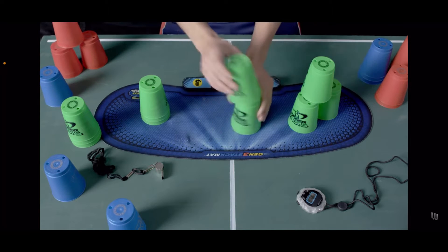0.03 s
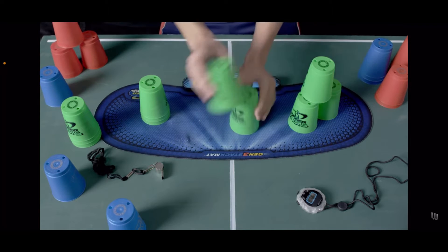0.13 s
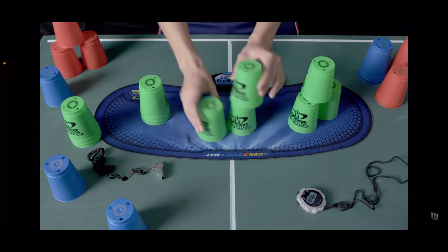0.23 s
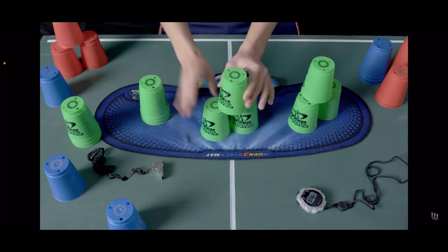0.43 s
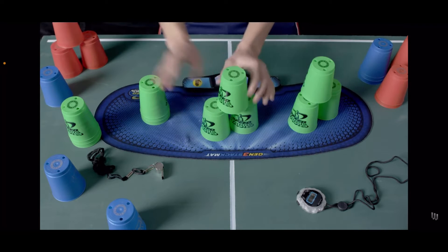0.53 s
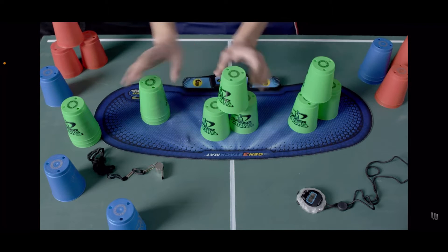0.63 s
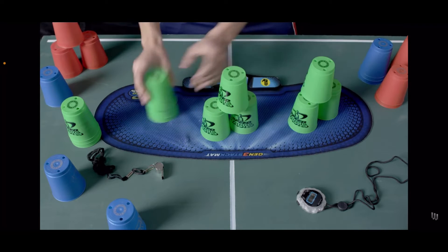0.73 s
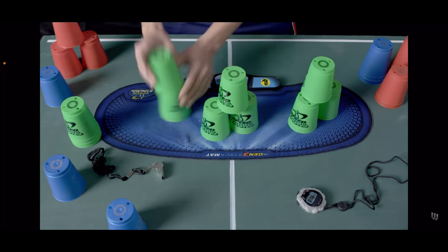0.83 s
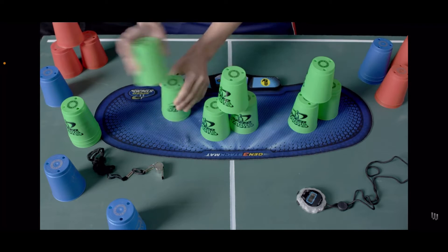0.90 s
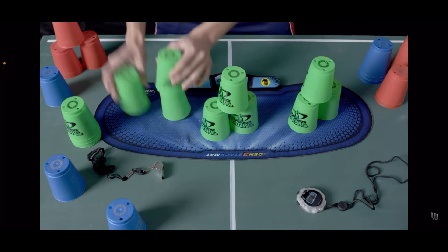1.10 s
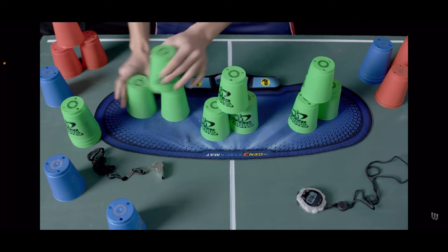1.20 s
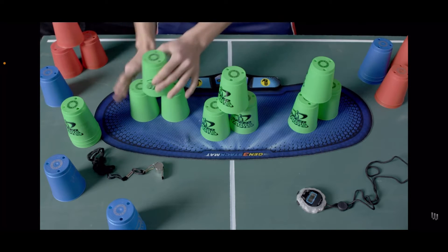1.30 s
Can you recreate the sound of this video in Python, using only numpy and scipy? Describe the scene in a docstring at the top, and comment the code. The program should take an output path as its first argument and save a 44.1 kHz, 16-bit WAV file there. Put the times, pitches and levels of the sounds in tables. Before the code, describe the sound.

In a small room, plastic cups slide apart and clack down fast on a mat-covered table. A hollow pop comes first, then a cluster of clacks, then another scrape and pop, with dull thuds beneath and a short echo.

```python
"""Stacking plastic cups

Hard plastic cups are stacked quickly on a padded mat on a table, in a small room.
Each cup scrapes out of the nested pile, then lands: its wall clacks, the air inside it pops
and the table thuds under the mat. The room rings briefly over a quiet rumble."""
import sys
import numpy as np
from scipy import signal
from scipy.fft import rfft, irfft
from scipy.io import wavfile

SR = 44100
rng = np.random.default_rng(int(sys.argv[2]) if len(sys.argv) > 2 else 0)


def generate_wav(sig):
    """Save sig (samples, or channels by samples) to the path in sys.argv[1] as 16-bit PCM at SR."""
    pcm = np.round(np.clip(np.atleast_2d(sig).T, -1, 1) * 32767).astype(np.int16)
    wavfile.write(sys.argv[1], SR, pcm)


N = 59535

# Levels in the tables are relative. A fade_s is the time a sound takes to drop by 60 dB.
# tone of the background rumble: frequency_hz, level_db
RUMBLE_TONE = [(20, -19), (40, 4.5), (100, -8), (200, -7), (500, -11.5), (1000, -27), (2500, -33.5),
               (5000, -42), (8000, -54.5)]
# the room's echo, band by band: frequency_hz, level_db, fade_s
ROOM_BANDS = [(60, -34, 0.32), (172, -7, 0.59), (280, -5, 0.19), (423, -11.5, 0.55), (866, -14.5, 0.45),
              (1350, -13, .6), (2000, -15.5, 0.57), (4000, -16, 0.35), (8000, -15, 0.18)]
# the room's share of the sound as the hands move to the farther pile: time_s, level_db
ROOM_SHARE = [(.25, -3.5), (.62, -0.5), (0.951, 0.5)]
# notes of the table under the mat: pitch_hz, level_db, fade_s
TABLE_NOTES = [(83, -13.5, 0.3), (104.8, 0, 0.089), (137.95, -7.5, 0.29), (186, -12, 0.15),
               (225, -5.5, 0.068)]
# blows through the mat: start_s, level_db, pitch_hz
MAT_BLOWS = [(0.045, -24, 124.6), (0.216, -15, 132), (0.252, -11, 161.8), (0.267, -25, 138.6),
             (0.433, -35, 125), (0.4915, -7, 225), (0.59, -12, 135), (0.616, -14, 159), (0.931, -28, 112.6),
             (1.099, -17.5, 201), (1.313, -37.5, 113)]
# a cup leaves the pile: start_s, length_s, hiss_from_db, hiss_to_db, chatter_from_db, chatter_to_db
CUP_SLIDES = [(0.115, 0.053, -44.5, -44, -55.5, -44), (0.166, 0.11, -41, -74, -46.5, -65),
              (0.499, 0.026, -46, -59, -45.5, -58), (0.903, 0.083, -63, -60, -62.5, -66),
              (0.99, 0.045, -45.5, -47.5, -71, -45.5), (1.031, .029, -42, -60, -40, -37.5),
              (1.09, 0.007, -31, -32, -29, -33.5)]
# tone of a cup sliding: frequency_hz, level_db
HISS_TONE = [(200, -17), (900, -16), (1800, -2), (4200, -12.5), (5100, -7.5), (6400, -1.5), (8000, -4.5)]
# tone of a cup coming free: frequency_hz, level_db
CHATTER_TONE = [(500, -42.5), (1200, -16), (1900, -7), (3000, -3.5), (4300, -5), (5200, -17), (8000, -19.5)]
# a cup lands mouth down and traps its air, and the mat beneath it rings: start_s, level_db, air_pitch_hz,
# mat_hz, mat_db, wall_hz, wall_db
SEALED_LANDINGS = [(.0445, -22.5, 793, 544, -5, 1100, -9.5), (0.2174, 1.5, 866, 557, -11.5, 1914, -17),
                   (1.0936, -7, 841, 456, -15, 1406, -10.5)]
# notes of the trapped air: pitch_multiple, level_db, fade_s
TRAPPED_AIR_NOTES = [(1.002, 2.5, 0.021), (1.119, -14, 0.035), (1.321, -21.5, 0.028)]
# a cup lands on others or on an edge, its mouth left open: start_s, level_db
UNSEALED_LANDINGS = [(0.4941, -16), (.579, -7.5), (0.5917, -4)]
# notes of the air in an open cup: pitch_hz, level_db, fade_s
OPEN_AIR_NOTES = [(407, 4.5, 0.041), (474.8, -14, 0.18), (551.3, -2, 0.046), (882, -23.5, 0.076),
                  (1086, -9.5, 0.02)]
# notes of a cup's wall: pitch_hz, level_db, fade_s
WALL_NOTES = [(1123, -10, 0.11), (1346, -7.5, 0.016), (1830, -22, 0.13), (2078, -4.5, 0.039),
              (2370, -6.5, 0.017), (2490, -5.5, 0.035), (2966, -7, 0.038), (3205, -2, 0.022),
              (3880, -10.5, 0.042), (4350, -12, 0.026), (5130, -19, 0.025), (5930, -12, .03),
              (6650, -4, 0.024), (7380, -1.5, 0.011)]
# tone of a rim's crack: frequency_hz, level_db
CRACK_TONE = [(200, 2), (600, 19), (1200, 0.5), (2500, 2), (4000, 1), (5500, -1.5), (7500, -7)]
# a rim strikes: start_s, level_db, low_cut_hz, high_cut_hz, crack_fade_s
RIM_HITS = [(0.0364, -34.5, 422, 9700, 0.08), (0.1741, -23.5, 2090, 5310, 0.017),
            (.1815, -18, 1380, 6230, 0.05), (.211, -26.5, 300, 2880, .03),
            (0.2164, -13.5, 1100, 9000, 0.019), (.2505, -29.5, 600, 3000, 0.041),
            (0.27, -40.5, 637, 6070, 0.077), (0.397, -49, 600, 3705, 0.024),
            (0.4923, -20.5, 780, 2800, 0.039), (.5118, -31, 1516, 8000, 0.064),
            (.5784, -15.5, 700, 2600, 0.061), (0.581, -21.5, 608, 3850, 0.11),
            (0.5939, -18, 513, 5000, 0.025), (0.5974, -17.5, 590, 4160, 0.044),
            (0.9253, -35, 1478, 7400, 0.051), (1.0519, -22.5, 1040, 3640, 0.017),
            (1.0696, -35, 1210, 1750, 0.011), (1.0926, -13, 500, 2960, 0.027),
            (1.0982, -27.5, 597, 6000, .025), (1.1032, -16, 796, 1310, 0.067)]

RUMBLE_DB, TABLE_DB, SLIDE_RING_DB, WALL_DB, CRACK_DB = -51.5, -9.5, -16, -10, -1
ROOM_GAP_S, ROOM_BUILD_S = 0.0086, 0.0055
PUSH_FADE_CYCLES = 7.47
SLIDE_ATTACK_S, SLIDE_RELEASE_S = 0.007, 0.001
CATCHES_PER_S, CATCH_SPREAD_DB = 3200, 2.5
GRIP_CHANGES_PER_S, GRIP_SPREAD_DB = 150, 1
POP_RISE_S, CRACK_RISE_S = 0.0017, 0.0005
MAT_FADE_S, WALL_FADE_S = 0.047, 0.03
LOW_CUT_HZ, TOP_HZ = 32, 7850


def undb(db):
    """Turn decibels into a gain."""
    return 10 ** (np.asarray(db) / 20)


def clock():
    """Time of every sample in seconds."""
    return np.arange(N) / SR


def log_frequencies():
    """The frequencies of a spectrum, on a log scale."""
    return np.log(np.maximum(np.arange(N // 2 + 1) * SR / N, 1))


def unit(x):
    """Scale to an average (rms) level of 1."""
    return x / np.sqrt(np.mean(x ** 2) + 1e-18)


def delay(x, seconds):
    """Start a sound later."""
    return np.concatenate([np.zeros(max(int(seconds * SR), 0)), x])[:N]


def through(x, response):
    """Let every sample of a sound set off the given ring or echo."""
    return signal.fftconvolve(x, response)[:N]


def colour(x, tone):
    """Shape a sound with a curve of (frequency_hz, level_db) points."""
    hz, db = np.array(tone).T
    return irfft(rfft(x) * undb(np.interp(log_frequencies(), np.log(hz), db)), N)


def dull(x, hz):
    """Gently turn down everything above hz."""
    return signal.sosfilt(signal.butter(2, hz, fs=SR, output="sos"), x)


def thin(x, hz):
    """Gently turn down everything below hz."""
    return signal.sosfilt(signal.butter(2, hz, "high", fs=SR, output="sos"), x)


def dip(x, hz=674, width_hz=218, depth=0.77):
    """Scoop out a narrow band between the pitches of the open and the trapped air."""
    return x - depth * signal.lfilter(*signal.iirpeak(hz, hz / width_hz, fs=SR), x)


def fade(fade_s):
    """Die away, 60 dB down after fade_s."""
    return np.exp(-np.log(1000) * clock() / fade_s)


def rise(rise_s):
    """Swell smoothly over about rise_s."""
    return 1 - np.exp(-(clock() / rise_s) ** 2)


def ring(notes):
    """Add up fading notes, each given as (pitch_hz, level_db, fade_s)."""
    return sum(undb(db) * fade(fade_s) * np.sin(2 * np.pi * hz * clock()) for hz, db, fade_s in notes)


def rumble():
    """Quiet, steady, low noise in the background."""
    return undb(RUMBLE_DB) * unit(colour(rng.standard_normal(N), RUMBLE_TONE))


def room_echo(x):
    """A wash of echoes builds up after a short gap; the highest treble dies first."""
    hz, db, fade_s = np.array(ROOM_BANDS).T
    noise, response = rfft(rng.standard_normal(N)), np.zeros(N)
    for k, only_this_band in enumerate(np.eye(len(ROOM_BANDS))):
        shape = fade(fade_s[k]) * rise(ROOM_BUILD_S)
        band = irfft(noise * np.interp(log_frequencies(), np.log(hz), only_this_band), N)
        response += undb(db[k]) * band * shape / np.sqrt(np.sum(shape ** 2))
    return through(x, delay(response, ROOM_GAP_S))


def far_wall_slap(x):
    """The far wall sends back one quiet, dull echo."""
    return undb(-19.5) * delay(dull(x, hz=2000), seconds=0.039)


def table_thuds():
    """The mat turns each blow into a soft push that dies fast; the table rings on after it."""
    table, out = undb(TABLE_DB) * ring(TABLE_NOTES), np.zeros(N)
    for start_s, db, hz in MAT_BLOWS:
        push = fade(PUSH_FADE_CYCLES / hz) * np.sin(2 * np.pi * hz * clock())
        thud = rise(0.5 / hz) * (push + dull(table, 2 * hz))
        out += undb(db) * delay(thud, start_s)
    return out


def cup_wall(detune=0.017, scatter_db=2):
    """The wall rings; every cup and point of contact gives a slightly different mix of notes."""
    out = np.zeros(N)
    for hz, db, fade_s in WALL_NOTES:
        pitch_shift, level_shift, flip = rng.standard_normal(3)
        note = (hz * (1 + detune * pitch_shift), db + scatter_db * level_shift, fade_s)
        out += np.sign(flip) * ring([note])
    return out


def rub(tone):
    """Plastic rubs in many tiny catches, swelling and sinking as the grip changes."""
    catches = (rng.random(N) < CATCHES_PER_S / SR) * np.sign(rng.standard_normal(N))
    catches *= undb(CATCH_SPREAD_DB * rng.standard_normal(N))
    grip = np.interp(clock() * GRIP_CHANGES_PER_S, np.arange(N), rng.standard_normal(N))
    return unit(colour(catches * undb(GRIP_SPREAD_DB * grip), tone))


def cup_slides():
    """Nested cups hiss as they slide and chatter as they come free; the rubbing rings the wall."""
    t, hiss, chatter = clock(), np.zeros(N), np.zeros(N)
    for start_s, length_s, hiss_from_db, hiss_to_db, chatter_from_db, chatter_to_db in CUP_SLIDES:
        end_s = start_s + length_s
        gate = np.clip((t - start_s) / SLIDE_ATTACK_S, 0, 1)
        gate *= np.clip((end_s - t) / SLIDE_RELEASE_S + 1, 0, 1)
        hiss += gate * undb(np.interp(t, [start_s, end_s], [hiss_from_db, hiss_to_db]))
        chatter += gate * undb(np.interp(t, [start_s, end_s], [chatter_from_db, chatter_to_db]))
    friction = hiss * rub(HISS_TONE) + chatter * rub(CHATTER_TONE)
    wall = cup_wall()
    return friction + undb(SLIDE_RING_DB) * through(friction, wall / np.sqrt(np.sum(wall ** 2)))


def air_pops():
    """The air in a landing cup swells and dies; it is about an octave lower if the mouth stays open."""
    swell, out = rise(POP_RISE_S), np.zeros(N)
    for start_s, db, air_hz, low_hz, low_db, high_hz, high_db in SEALED_LANDINGS:
        air = [(air_hz * multiple, note_db, fade_s) for multiple, note_db, fade_s in TRAPPED_AIR_NOTES]
        wall = [(low_hz, low_db, MAT_FADE_S), (high_hz, high_db, WALL_FADE_S)]
        out += undb(db) * delay(swell * ring(air + wall), start_s)
    open_pop = swell * ring(OPEN_AIR_NOTES)
    return out + sum(undb(db) * delay(open_pop, start_s) for start_s, db in UNSEALED_LANDINGS)


def rim_clacks():
    """A rim strikes with a short crack and the wall rings; soft hits are dull, glancing ones thin."""
    out = np.zeros(N)
    for start_s, db, low_cut_hz, high_cut_hz, fade_s in RIM_HITS:
        crack = unit(colour(rng.standard_normal(N), CRACK_TONE)) * fade(fade_s) * rise(CRACK_RISE_S)
        hit = undb(CRACK_DB) * crack + undb(WALL_DB) * cup_wall()
        hit = thin(dull(hit, high_cut_hz), low_cut_hz)
        out += undb(db) * delay(hit, start_s)
    return out


def scene():
    """Mix the cups and table with the room's echoes and rumble, in one channel."""
    cups = rim_clacks() + air_pops() + table_thuds() + cup_slides()
    direct = dip(thin(cups, LOW_CUT_HZ))
    into_room = direct * undb(np.interp(clock(), *np.array(ROOM_SHARE).T))
    return (rumble() + room_echo(into_room) + far_wall_slap(into_room) + direct)[None, :]


def record(dry):
    """Steeply cut the treble above TOP_HZ."""
    return signal.sosfilt(signal.ellip(10, 0.3, 58, TOP_HZ, fs=SR, output="sos"), dry)


dry = scene()
out = record(dry)
generate_wav(out)
```